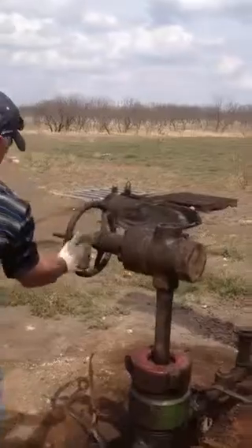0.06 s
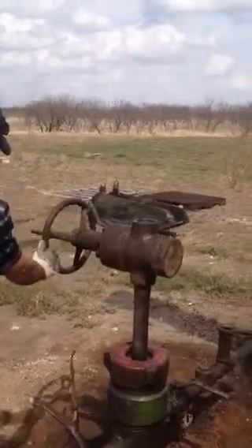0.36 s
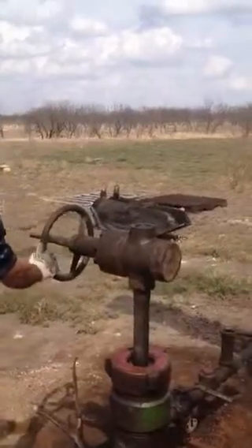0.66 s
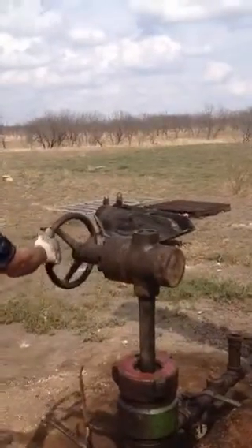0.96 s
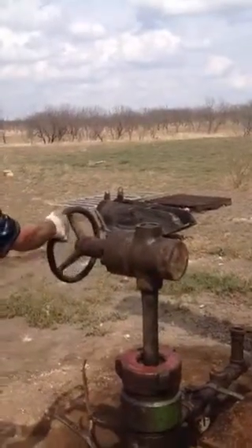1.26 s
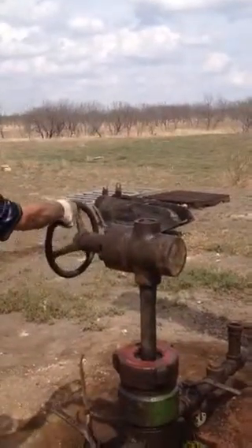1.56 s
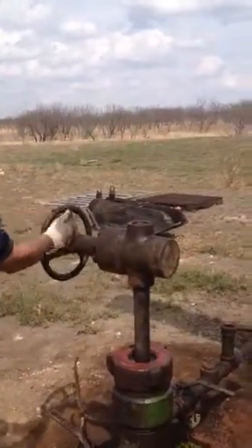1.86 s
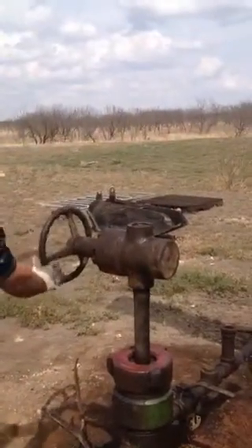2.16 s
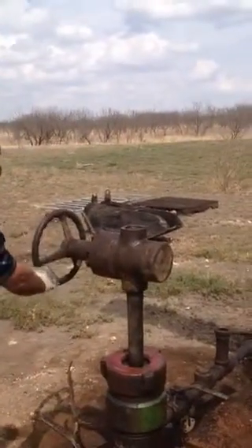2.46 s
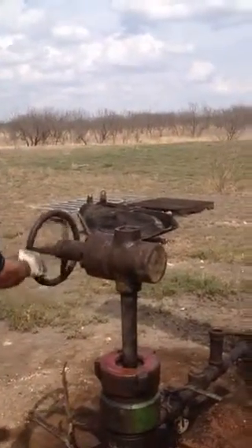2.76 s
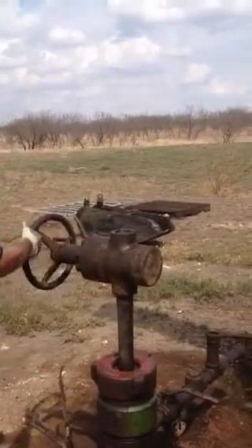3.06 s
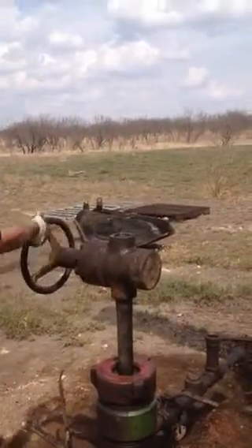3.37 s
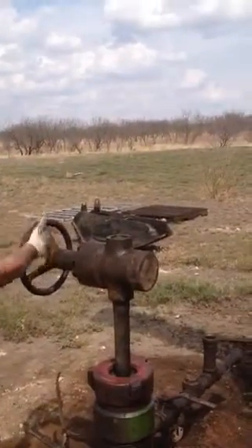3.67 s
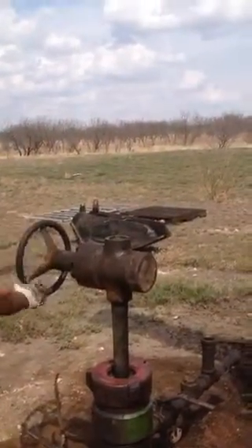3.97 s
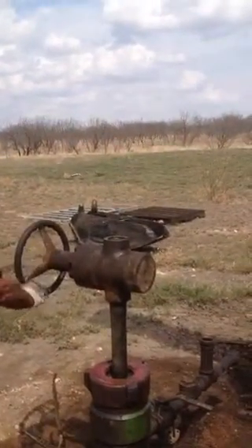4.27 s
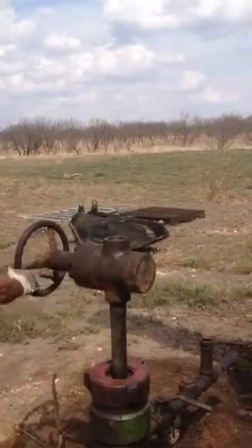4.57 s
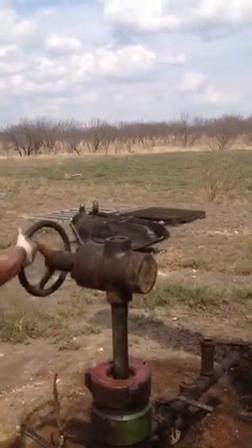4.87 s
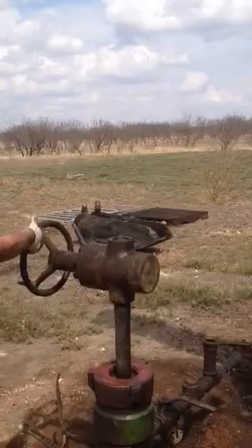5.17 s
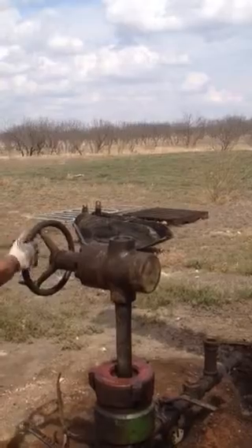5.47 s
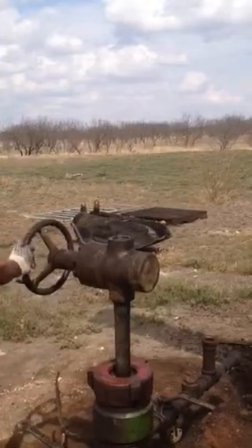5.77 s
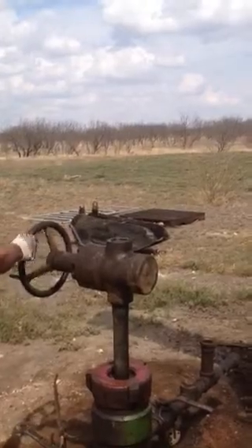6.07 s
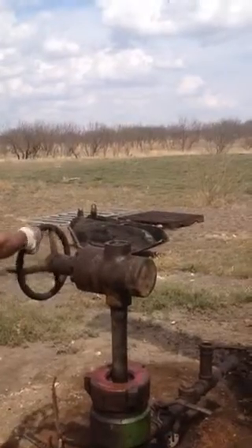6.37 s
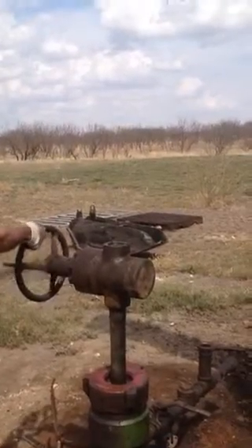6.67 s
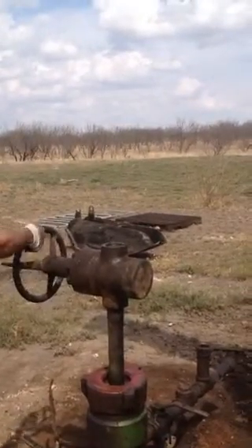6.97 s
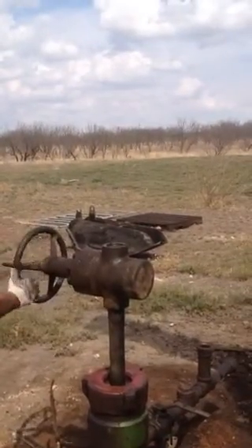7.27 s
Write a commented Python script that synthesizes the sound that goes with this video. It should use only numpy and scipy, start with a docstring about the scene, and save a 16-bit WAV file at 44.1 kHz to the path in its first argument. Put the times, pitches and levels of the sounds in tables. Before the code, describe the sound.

Gas escapes continuously from a metal wellhead valve in an open field, heard through a mono microphone. At first it is a faint, thin, high hiss. From about 0.7 to 1.6 seconds it swells as the valve is turned, gaining a hollow rush and a slight pipe rumble. A quick cluster of dull, low thumps comes around 1 second, with softer ones near 2 seconds. Between 2.7 and 3.6 seconds the hiss grows again and a roar fills in beneath it. From 4.6 to 5.4 seconds it becomes much louder and sharper, then rises once more from 5.8 to 6.6 seconds, while faint ringing tones in the outlet sink slightly. The jet then holds loud and steady until the end at about 7.5 seconds, almost covering two more soft thumps. Light wind flutters low on the microphone, mostly noticeable early.

```python
"""Opening a gas valve in a field

Gas escapes from a wellhead valve while its handwheel is turned open in several pulls.
The jet hisses at the valve's seat and roars in the outlet, whose ringing tones sink as it opens.
A light wind flutters on a mono microphone, with a few dull thumps."""
import sys
import numpy as np
from scipy import signal
from scipy.fft import rfft, irfft
from scipy.io import wavfile

SR = 44100
rng = np.random.default_rng(int(sys.argv[2]) if len(sys.argv) > 2 else 0)


def wav_record(signal):
    """Record a signal, one row per channel, as 16-bit PCM in the file named by sys.argv[1]."""
    frames = np.transpose(np.atleast_2d(signal))
    bounded = np.clip(frames, -1, 1)
    # unit amplitude maps onto the largest positive 16-bit level
    quanta = np.round(bounded * 32767).astype(np.int16)
    wavfile.write(sys.argv[1], SR, quanta)


N = 322812


def amp(db):
    """Turn decibels into a number to multiply the sound by."""
    return 10 ** (np.asarray(db) / 20)


def colour(points, hz):
    """Gain along a curve of (f/Hz, level/dB) points, losing 20 dB per octave past its ends."""
    f, db = np.transpose(points)
    octave, known = np.log2(np.maximum(hz, 1)), np.log2(f)
    beyond = np.abs(octave - np.clip(octave, known[0], known[-1]))
    return amp(np.interp(octave, known, db) - 20 * beyond)


def wander(t, rate):
    """A random wiggle, about 1 in size, that heads for a new value rate times per unit of t."""
    steps = rng.standard_normal(4096)
    return np.sqrt(3 / 2) * np.interp(t * rate, np.arange(len(steps)), steps)


def bell(hz, centre, width):
    """The hump of one resonance (a pitch at which something rings), 1 at its centre."""
    return 1 / (1 + (2 * (hz - centre) / width) ** 2)


def wind(lull_db=-71.5, flutter_db=1.0, flutter_rate=18):
    """Air flutters low and unevenly on the microphone, swelling and sinking with each gust."""
    # tone of the wind: f/Hz, level/dB
    spectrum = [(25, -8), (50, 0), (85, -0.5), (140, 1.5), (200, 0.5), (300, -12), (500, -46)]
    # gusts: peak t/s, length/s, rise above the lull/dB
    gusts = [(.2, 1.3, 14), (1.098, .7, 18), (1.87, 0.4, 11), (2.923, 0.68, 10.5), (4.08, 1.9, 13),
             (6.94, 0.53, 12.5)]
    t = np.arange(N) / SR
    air = irfft(rfft(rng.standard_normal(N)) * colour(spectrum, np.fft.rfftfreq(N, 1 / SR)), N)
    gust_db = sum(db * np.cos(np.pi * np.clip((t - peak) / length, -.5, .5))
                  for peak, length, db in gusts)
    return air / air.std() * amp(lull_db + gust_db + flutter_db * wander(t, flutter_rate))


def thumps(wobble=0.18, overtone_db=-17):
    """Each dull thump is a soft push of a few uneven, lopsided low waves."""
    # thumps: start t/s, level/dB, f/Hz, length/s
    pushes = [(0.848, -41, 150, .022), (0.874, -45, 119, .022), (.962, -46, 173, .018),
              (.993, -30.5, 165, .013), (1.007, -30, 179, 0.0174), (1.075, -34, 163, 0.021),
              (1.129, -38, 209, .013), (1.139, -32.5, 139, .018), (1.3, -44, 170, 0.017),
              (1.321, -43.5, 120, 0.019), (1.901, -41.5, 178, .019), (2.183, -44, 143, .017),
              (6.877, -37, 135, .02), (7.274, -40, 137, 0.024)]
    out = np.zeros(N + SR)
    for start, db, hz, length in pushes:
        t = np.arange(int(length * SR)) / SR
        phase = 2 * np.pi * (rng.random() + np.cumsum(hz * (1 + wobble * wander(t, hz))) / SR)
        wave = np.sin(phase) + amp(overtone_db) * np.sin(2 * phase)
        swell = np.sin(np.pi * t / length)
        first = int(start * SR)
        out[first:first + len(t)] += amp(db) * swell * wave
    return out[:N]


def handwheel(t, clears_at_db=9, clears_over_db=16):
    """Each pull lets more gas through. Gives the outlet's opening (0-1) and four noise levels in dB."""
    # pulls on the wheel: start t/s, length/s, then changes in hiss/dB, roar/dB, rush/dB, rumble/dB
    pulls = [(.66, 0.95, 4, 9, 6.3, 7.0), (2.65, 0.95, 4, 9.5, 3.5, 1.5), (4.55, 0.33, 1.86, 3.5, 1.4, 1.5),
             (4.764, 0.59, 11, 6, 0.5, -5), (5.824, 0.76, 6, 7.2, 6.5, -0.9)]
    nearly_shut_db = np.array([-46, -60.5, -57.5, -60])  # hiss, roar, rush, rumble
    rise_db = 0
    for start, length, *changes in pulls:
        turned = (1 - np.cos(np.pi * np.clip((t - start) / length, 0, 1))) / 2
        rise_db = rise_db + np.outer(changes, turned)
    # the outlet starts to clear once the hiss has risen far enough
    opening = np.clip((rise_db[0] - clears_at_db) / clears_over_db, 0, 1)
    return opening, nearly_shut_db[:, None] + rise_db


def resonance(hz, opening, sink=0.053, ripple_db=1.98, ripple_hz=32):
    """The outlet, the steel body and nearby echoes boost some pitches and weaken others."""
    # peaks and dips of the outlet: f/Hz nearly shut, width/Hz, level/dB nearly shut, level/dB open
    outlet = [(604, 170, 3, 0), (746, 150, 7.5, 16.5), (778, 140, 4, -0.5), (2133, 200, 3.5, 0.5),
              (3524, 117, 11, 12.5), (4210, 260, 5, 8.5), (5680, 105, 5, 2), (6280, 290, 6, 5.5),
              (6835, 710, 7.5, 7), (8100, 170, 2.6, 0.5), (9000, 460, 8.5, 8.5), (10340, 510, -6.5, -4),
              (11310, 450, 9, 6.5), (12670, 880, -4.5, -8.5), (14440, 1900, 5.5, -2)]
    # steady peaks and dips from the steel body and echoes off the ground: f/Hz, width/Hz, level/dB
    body = [(354, 70, -13), (860, 45, -5.5), (1020, 140, 3), (1107, 85, -4.5), (1340, 50, -3.5),
            (1796, 185, 4.5), (1860, 53, -9), (2014, 154, 8.5), (2248, 62, 8.5), (2324, 97, -9.5),
            (2507, 33, 3.5), (2716, 61, 6.5), (2777, 77, -6), (3050, 85, 4.5), (4975, 61, 3.5),
            (7360, 281, 1.5)]
    tuning = 1 - sink * opening  # only the outlet's pitches slide down as it opens
    outlet_db = sum((shut + (wide - shut) * opening) * bell(hz / tuning, f, width)
                    for f, width, shut, wide in outlet)
    body_db = sum(db * bell(hz, f, width) for f, width, db in body)
    echoes_db = ripple_db * wander(hz, 1 / ripple_hz)  # many faint echoes leave tiny peaks and dips
    return amp(outlet_db + body_db + echoes_db)


def sputter(depth_db=0.23, rate=130):
    """The whole jet trembles quickly in loudness as it leaves the outlet."""
    return amp(depth_db * wander(np.arange(N) / SR, rate))


def gas_jet(flicker_db=0.46, flicker_rate=14, frame=2048):
    """Swirling gas makes four noises, each flickering on its own, that sound through the resonances."""
    # hiss at the seat, the narrow gap inside the valve: f/Hz, level/dB
    hiss = [(2000, -27.5), (4000, -9.5), (5500, -8.5), (9000, -1.5), (12500, 0.5), (14200, -4),
            (15100, -9.5)]
    # roar of the jet: f/Hz, level/dB
    roar = [(500, -13), (900, -7.5), (1300, -4), (2500, 2.5), (4200, -6.5), (5500, -5), (9000, -7.5)]
    # hollow rush in the outlet: f/Hz, level/dB
    rush = [(400, -9), (550, -6), (720, -1), (1000, -0.5), (1500, -4)]
    # rumble in the pipe: f/Hz, level/dB
    rumble = [(40, -35), (120, -33), (175, -5), (270, 1), (450, -3.5), (600, -9.5), (900, -22.5)]
    # cut noise into short slices, so that its tone can change over time
    slices = dict(nperseg=frame, noverlap=frame * 3 // 4)
    hz, t, swirls = signal.stft(rng.standard_normal(N), SR, **slices)
    hz = hz[:, None]
    opening, levels_db = handwheel(t)
    ringing = resonance(hz, opening)
    power = 0
    for spectrum, flow_db in zip((hiss, roar, rush, rumble), levels_db):
        shape = (colour(spectrum, hz) * ringing) ** 2
        loudness = amp(flow_db + flicker_db * wander(t, flicker_rate))
        power = power + shape / shape.mean(axis=0) * loudness ** 2
    return signal.istft(swirls * np.sqrt(power), SR, **slices)[1][:N]


def scene():
    """Gas, wind and thumps reach one microphone, the same in both channels."""
    mono = gas_jet() * sputter() + wind() + thumps()
    return np.array([mono, mono])


def record(dry, low_cut_hz=81, top_hz=15250):
    """The microphone loses the deepest bass, and the highest treble is cut off steeply."""
    thin = signal.sosfilt(signal.butter(2, low_cut_hz, "highpass", fs=SR, output="sos"), dry)
    return signal.sosfilt(signal.ellip(12, .2, 80, top_hz, fs=SR, output="sos"), thin)


dry = scene()
out = record(dry)
wav_record(out)
```